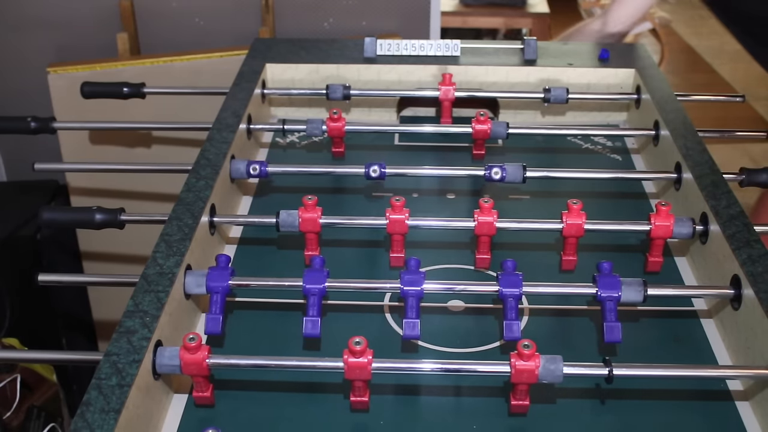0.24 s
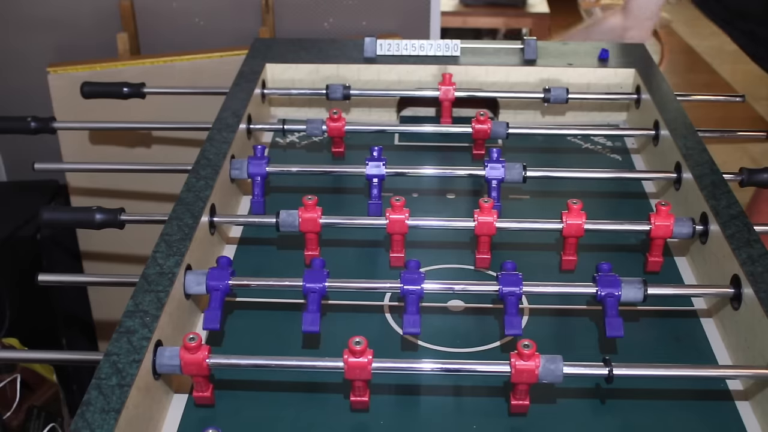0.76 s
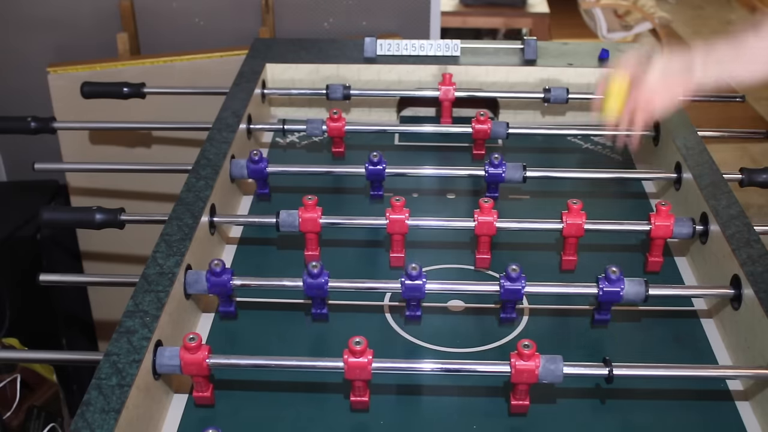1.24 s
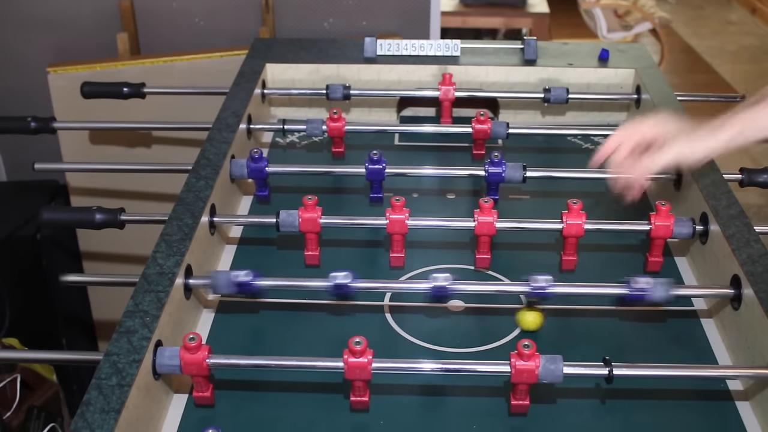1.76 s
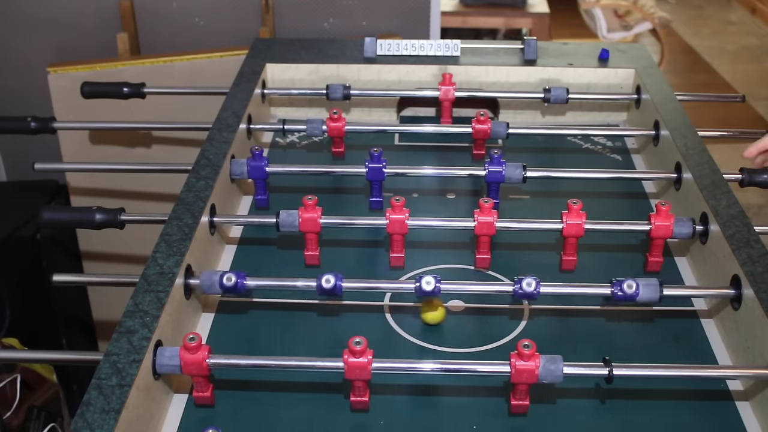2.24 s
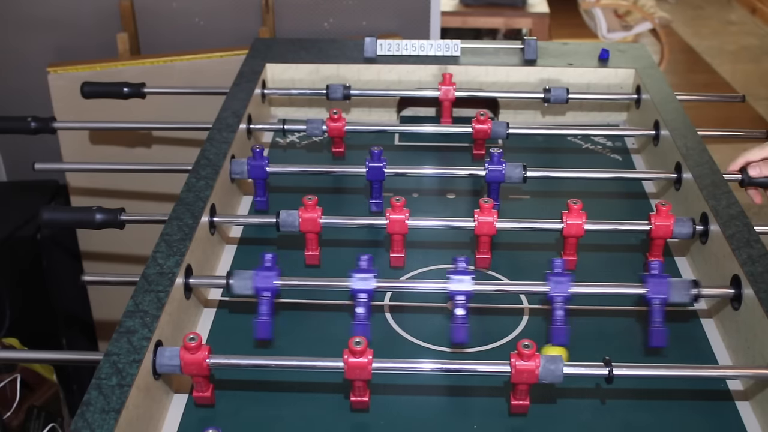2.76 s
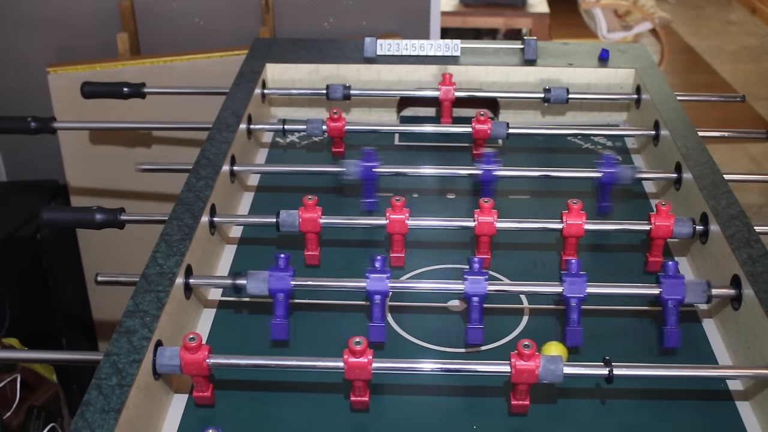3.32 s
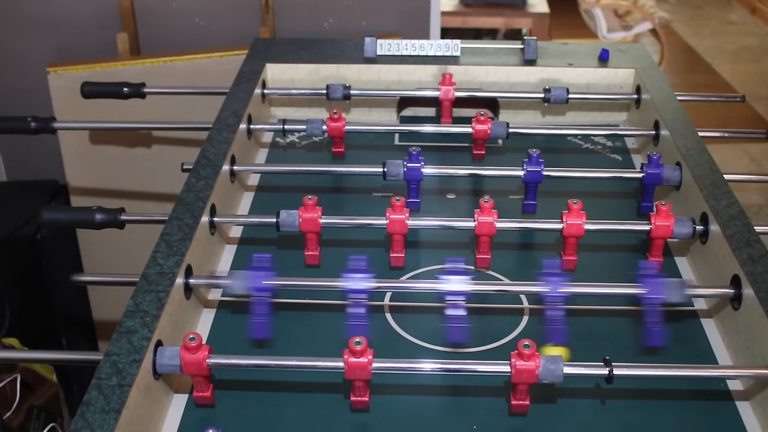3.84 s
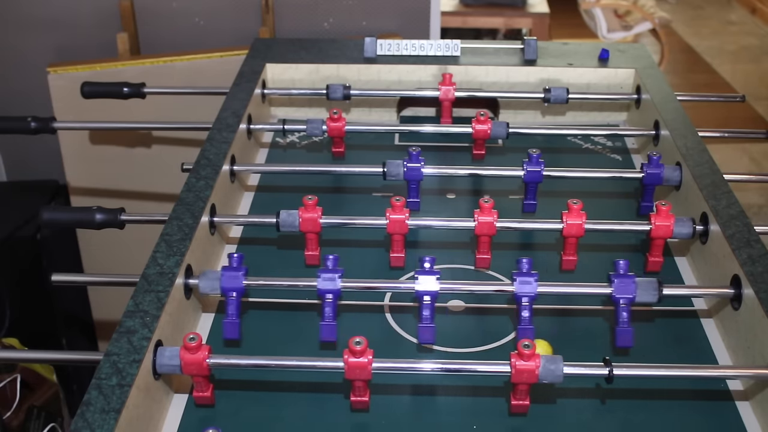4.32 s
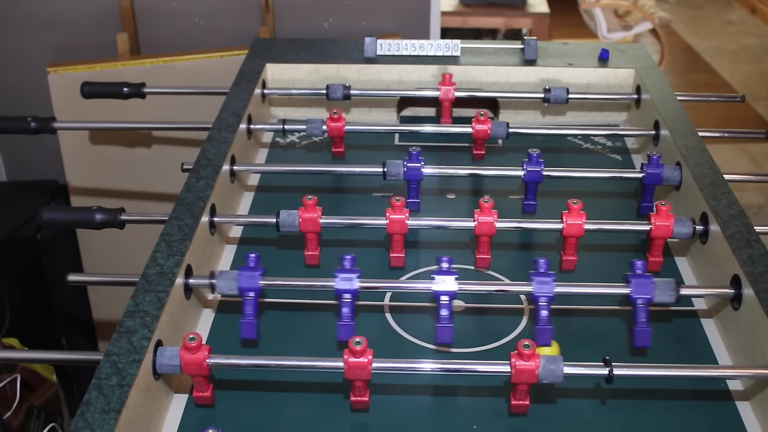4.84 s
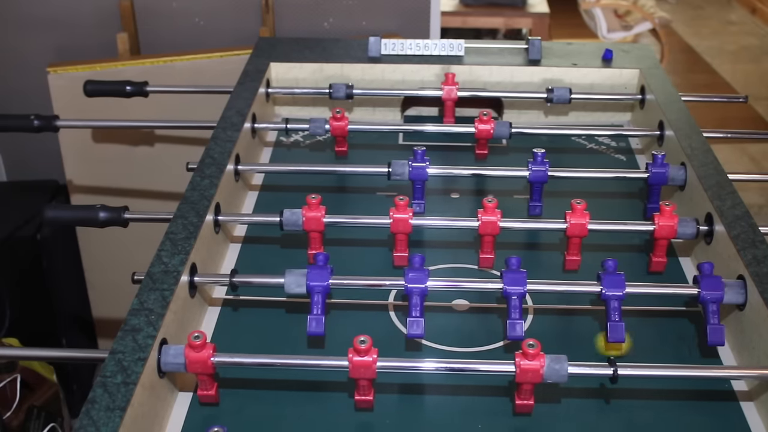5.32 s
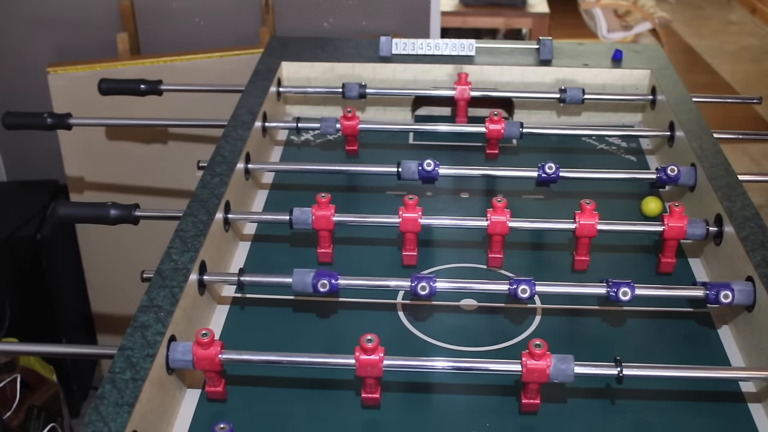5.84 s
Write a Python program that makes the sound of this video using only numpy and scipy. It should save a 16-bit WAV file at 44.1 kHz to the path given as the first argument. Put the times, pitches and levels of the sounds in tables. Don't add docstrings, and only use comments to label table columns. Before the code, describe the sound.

Table football heard very near in a small indoor room. Quiet hollow knocks come first, then a loud booming drop of the ball, grainy rolling, and hard plastic kicks that shake the wooden table. A spell of repeated rod scraping and metallic clacks follows, before a final burst of booming blows, busy plastic rattling and a faint high steel ring. Light hiss lies underneath, with short room echoes.

```python
import sys
import numpy as np
from scipy import signal
from scipy.fft import rfft, irfft, next_fast_len
from scipy.io import wavfile
from scipy.ndimage import uniform_filter1d

SR = 44100
rng = np.random.default_rng(int(sys.argv[2]) if len(sys.argv) > 2 else 0)


def pcm_store(signal):
    levels = np.round(np.clip(np.atleast_2d(signal), -1, 1) * 32767)
    wavfile.write(sys.argv[1], SR, levels.astype(np.int16).T)


def volts_from_decibels(level):
    exponent = np.asarray(level, float) / 20
    return 10 ** exponent


N = 268128

# start in seconds, board level in dB, then frame, rail and walls in dB against it.
BLOWS = [(0.265, -34.5, -14, -7, -4), (1.055, -42, -12, -9, -14), (1.554, -26.5, -6.5, -23, -8),
         (1.612, -21, -17, -2.5, -3), (1.6492, -6, -13.5, -17, -6), (2.252, -3, -14.5, -13, -8.5),
         (2.412, -3.5, -12, -20, -10), (2.607, -14.5, -21, -6.5, -12.5), (2.702, -35, -24, 10, -27),
         (2.861, -6, -5, -11, -3.5), (3.54, -40, 10, -3, -31), (3.738, -10, -14, -28, -30),
         (5.2507, -3.5, -11, -17.5, -7.5), (5.413, -17, -0.5, -6, -12), (5.614, -9.5, -44, -1, -5.5),
         (5.715, -21, -36, 2, 0)]
# frequency in Hz, level in dB, t60 in seconds.
FRAME_MODES = [(70.4, -5, 0.33), (85.1, -9.5, 0.38), (130.3, 0.5, 0.22), (147, -6, 0.25)]
BOARD_MODES = [(173, -12, 0.12), (192.3, -4.5, 0.14), (225.8, -2.5, 0.2), (248.5, 0, 0.21), (274, -9, 0.19),
               (299, -2, 0.13), (331.6, -1.5, 0.072), (351.6, -0.5, 0.14), (388, 0, 0.044)]
RAIL_MODES = [(423, -11, 0.091), (469, -6.5, 0.053), (523, -6.5, 0.048), (562.7, -9.5, 0.068),
              (645, -13, 0.041), (705, -10.5, 0.051), (791, -13, 0.074)]
WALL_MODES = [(920, -40, 0.015), (932.2, -2, 0.11), (972, 12.5, 0.015), (1167, -0.5, 0.02),
              (1196, 4.5, 0.029), (1272, -1, 0.085), (1385, 4.5, 0.028), (1504, -5, 0.043),
              (1520, -12, 0.024)]
# start in seconds, length in seconds, board level in dB, nearness to the walls in dB, frame in dB.
ROLLS = [(-.05, 0.072, -39.5, 3.5, -4.5), (0.135, 0.13, -49, 6, -8), (0.663, 0.11, -46, 12, -19),
         (1.35, 0.36, -45.5, 1, -35), (1.672, 0.19, -30.5, -4, -1), (1.814, 0.4, -30, -2, -12),
         (2.348, 0.067, -24, -1, -4), (2.44, 0.18, -29, -0.5, -2.5), (2.643, 0.16, -29.5, -1, -10),
         (2.89, 0.11, -27.5, -1, 1), (3.048, 0.28, -38.5, 6.5, -8), (3.242, .14, -30, 7, -5),
         (3.401, 0.3, -37, 10.5, 2), (3.649, 0.35, -35.5, 8.5, -11), (3.997, 0.26, -37.5, 8.5, 0),
         (4.278, 0.23, -35.5, 6.5, -4), (4.455, 0.31, -37.5, 8, 0.5), (4.778, 0.34, -46, 10, -7.5),
         (5.096, 0.23, -36, 5, -16), (5.301, 0.15, -29, 6.5, -19), (5.408, 0.15, -24, 4.5, -8),
         (5.62, 0.056, -28.5, 1, -33), (5.718, 0.16, -28, 10.5, -22), (5.828, .24, -44, 9, 2.5)]
# start and length in seconds, Hz, level in dB.
HUMS = [(1.335, 0.13, 217.4, -47), (1.43, 0.11, 335, -45), (1.616, 0.031, 390, -26.5),
        (1.62, .06, 950, -30), (1.68, .08, 1250, -43), (1.691, 0.086, 297, -25), (1.659, 0.05, 2150, -48.5),
        (2.269, 0.15, 251, -21), (2.372, .04, 950, -38), (2.438, .14, 242.6, -23),
        (2.599, 0.085, 960, -33.5), (2.72, .13, 942, -34), (2.6, 0.28, 550, -36), (2.691, 0.17, 343, -24.5),
        (2.871, 0.041, 1367, -27), (2.93, 0.15, 250.5, -24), (2.951, .07, 1330, -38),
        (3.643, 0.051, 380, -34.5), (3.746, 0.063, 342, -25), (5.419, 0.17, 960, -37),
        (5.63, .022, 371, -15), (5.628, 0.046, 1000, -35), (5.72, 0.054, 393, -27.5), (5.74, .07, 794, -34),
        (5.742, 0.056, 1410, -29.5), (5.819, 0.077, 416, -30), (5.829, 0.063, 1450, -36),
        (3.34, .025, 2700, -40), (3.35, .03, 2300, -35), (3.905, .03, 2350, -39), (5.64, .1, 270, -28),
        (2.66, .15, 1300, -45), (2.68, .15, 270, -28), (5.16, .08, 170, -40), (1.95, .15, 68, -41),
        (4.15, .15, 125, -36), (4.45, .12, 190, -42), (3.3, .12, 200, -34), (.42, .1, 130, -50),
        (5.255, .03, 1300, -31), (5.42, .03, 2400, -39), (1.69, .08, 2300, -58), (2.43, .2, 70, -32),
        (5.42, .16, 68, -33), (1.15, .15, 250, -58), (5.42, .07, 6500, -42), (5.2, .12, 150, -37),
        (3.01, .09, 250, -25)]
# start in seconds, Hz, level in dB, t60 in seconds.
BOUNCES = [(1.732, 307, -16, .08), (1.858, 300, -26, .06), (2.019, 280, -19, .06), (2.042, 302, -22, .06),
           (2.072, 298, -23, .06), (2.152, 280, -20, .06), (2.554, 247, -20, 0.053), (2.794, 338, -12, .06),
           (2.937, 253, -19, 0.066), (5.575, 330, -19, .06), (5.6145, 580, 2, .03), (5.616, 2100, -11, .03),
           (5.716, 1300, -7, .025), (5.721, 2700, -13, .03), (1.648, 1250, -10, .03),
           (3.746, 980, -25, .07), (1.655, 2050, -23, .05), (2.863, 1400, -13, .04), (2.5, 260, -15, .04),
           (2.32, 260, -15, .04), (2.356, 260, -16, .04), (5.3, 250, -14, .05), (5.895, 330, -20, 0.032)]
# start in seconds, Hz, level in
# dB, t60 in seconds.
MORE_TONES = [(.163, 355, -29, .15), (.172, 641, -28, .08), (.168, 800, -32, .12), (.345, 339, -32, .13),
              (.352, 635, -32, .08), (.35, 800, -35, .13), (.662, 360, -18, .1), (.662, 620, -18, .05),
              (.69, 786, -30, .2), (1.6607, 310, -14, .05), (1.668, 300, -13, .05), (2.268, 260, -12, .05),
              (2.29, 250, -18, .1), (2.43, 260, -12, .04), (3.757, 330, -16, .06), (5.253, 145, -13, .2),
              (5.63, 275, -15, .12)]

# start in seconds, peak level in dB, crack in dB and cavity ring in dB against it.
KNOCKS = [
    (0.163, -29, -34, 7),
    (0.343, -32, -29, 7.5),
    (0.651, -10, -1, -8.5),
    (0.661, -8.5, -11, -11.5),
]
# frequency in Hz, level in dB, t60 in seconds.
TRAY_MODES = [(195, -17, 0.35), (280, -14, 0.25), (350, 5.5, 0.092), (403, -6.5, 0.22), (659, 3.5, 0.081),
              (733, 8, 0.034), (784.7, 1.5, 0.15), (812, -5.5, 0.12), (840, -22, 0.084), (1050, -25, 0.061),
              (1204, -9, 0.066), (1420, -18, 0.12), (1500, -12, 0.11), (2010, -12, 0.067), (2470, -18, .06)]
# frequency in Hz, width in Hz, level in dB.
TRAY_RAP = [(290, 58, -5), (627, 164, -2.5), (1100, 910, -8.5), (1860, 900, -11.5), (4700, 850, -28)]
# frequency in Hz, level in dB, t60 in seconds.
CAVITY_MODES = [(472, 0, 0.44)]

# start in seconds, Hz, level in dB, chatter time in seconds.
CLATTER = [(.164, 1550, -50, .012), (.35, 1480, -46, .025), (.655, 4600, -44, .015),
           (1.6495, 1300, -24, .004), (1.651, 2200, -33, .006), (1.66, 1350, -28, .006),
           (1.833, 2300, -44, .01), (2.2525, 2100, -26, .003), (2.267, 1050, -22, .007),
           (2.327, 2300, -32, .003), (2.4125, 2200, -28, .003), (2.426, 2300, -29, .004),
           (2.426, 1200, -27, .005), (2.434, 2300, -28, .003), (2.563, 2300, -33, .008),
           (3.352, 2500, -31, .006), (3.357, 1200, -36, .008), (3.737, 1000, -29, .008),
           (3.762, 2900, -40, .003), (5.424, 1300, -27, .005), (5.432, 2500, -28, .006),
           (5.453, 3400, -29, .006), (5.472, 1200, -28, .005), (5.49, 2300, -35, .006),
           (5.522, 1300, -28, .004), (5.53, 3000, -32, .008), (5.552, 2500, -33, .008),
           (5.617, 2200, -22, .003), (5.63, 2300, -32, .005), (5.7215, 2700, -23, .003),
           (2.8625, 2400, -24, .004), (5.354, 8800, -24, .002), (.263, 2000, -44, .012),
           (5.745, 2200, -27, .004), (5.763, 1500, -27, .004), (5.79, 2600, -29, .004),
           (5.81, 2200, -29, .003), (5.85, 1500, -28, .005), (2.864, 1400, -20, .004),
           (.177, 560, -34, .012), (.355, 560, -38, .012)]

# start in seconds, steel in dB, plastic in dB against it, chatter in seconds.
STOPS = [(1.0957, -38.5, -12.5, 0.017), (1.6594, -24.5, -7.5, 0.0038), (1.934, -17, -10, .016),
         (3.2783, -14, -11.5, 0.019), (3.5679, -17, -9.5, 0.023), (3.8615, -12.5, -11.5, 0.017),
         (4.051, -36.5, -7.5, 0.01), (4.156, -14.5, -10, 0.011), (4.4411, -18, -8, 0.019),
         (4.7415, -14.5, -10.5, 0.011), (5.3526, -5, -15.5, 0.0052)]
# start in seconds, steel in dB, plastic in dB, chatter time in seconds.
KICKS = [
    (2.252, -23.5, -2, 0.006),
    (2.327, -34, 2, 0.0061),
    (2.4128, -26, 0.5, 0.015),
    (2.569, -29, 0.5, 0.026),
    (2.8624, -29, 10.5, 0.0091),
    (2.9612, -40.5, 7, 0.02),
]
# start in seconds, steel in dB, plastic in dB, chatter in seconds.
TAPS = [(.263, -49.5, 9.5, .012), (.5378, -47.5, -4, .07), (.6552, -37.5, 5.5, 0.021),
        (1.17, -56, 6.5, 0.007), (1.5531, -38, -2.5, 0.024), (1.6494, -50, -9, 0.009),
        (2.389, -32, -9, 0.0054), (3.4456, -36, -0.5, 0.015), (3.7624, -23, -10.5, 0.012),
        (5.2137, -22.5, -13.5, 0.0093), (5.2215, -17.5, -12, 0.0032), (5.2524, -44, 15, 0.0046),
        (5.38, -23, -24, 0.091), (5.5179, -33.5, 10.5, 0.026), (5.6154, -16.5, 5, 0.002),
        (5.7158, -30, 16.5, 0.0072), (5.896, -25.5, -4, 0.011), (5.945, -29.5, -8, .0069)]
# start in seconds, steel in dB, plastic in dB, chatter time in seconds.
TICKS = [
    (1.075, -47.5, -10, 0.022),
    (1.8307, -31, -19, 0.0073),
    (1.8399, -27, -7.5, 0.0094),
    (2.7472, -41, -5, 0.0098),
    (3.0608, -39.5, -5, 0.016),
    (4.3453, -39, -13, 0.03),
    (5.066, -57, 7, 0.01),
    (5.1682, -44, 6, .01),
]
# start in seconds, length in seconds, figures in dB, bare steel in dB against the figures.
STROKES = [(0.514, 0.078, -50, -5), (1.03, 0.24, -64, -8), (1.22, 0.21, -58, -9),
           (1.383, 0.16, -52.5, -2.5), (1.553, 0.085, -44, -22), (1.789, 0.12, -38.5, -10),
           (1.928, 0.11, -42, -4.5), (2.298, 0.1, -36, -12.5), (2.44, 0.11, -36.5, -11.5),
           (2.553, 0.085, -37, -26), (2.858, 0.26, -42, -15), (3.138, 0.15, -44.5, -2),
           (3.3, 0.084, -30.5, -16), (3.42, 0.13, -44.5, -2.5), (3.56, 0.3, -44.5, -3.5),
           (3.878, 0.11, -38.5, -7), (3.99, 0.14, -47, -1.5), (4.15, 0.12, -41, -10), (4.26, 0.22, -45, -3),
           (4.45, 0.12, -43, -8.5), (4.581, 0.095, -43, -4.5), (4.797, 0.33, -51.5, -14),
           (5.113, 0.072, -54, 3.5), (5.286, 0.073, -40, -5.5), (5.374, 0.1, -24.5, -11.5),
           (5.53, 0.079, -40.5, -23), (5.62, 0.044, -50, 4.5), (5.721, 0.13, -28, -17),
           (5.858, 0.056, -34, -9), (5.937, 0.093, -41, -31)]
# frequency in Hz, width in Hz, level in dB.
PLASTIC = [(1170, 200, -2.5), (2035, 850, -3.5), (2328, 226, 3), (2792, 254, -3), (3680, 1430, -8.5)]
BUSH = [(3900, 810, -6.5), (4870, 370, 1), (5570, 580, -2)]
STEEL = [(6980, 1010, 0.5), (8860, 870, -2.5), (9730, 400, -1.5)]
SPARKLE = [(10840, 1250, 13), (12900, 2400, 10.5), (14360, 1700, 10.5)]
# start in seconds, Hz, level in dB, t60 in seconds.
RINGS = [
    (5.452, 13410, -42, .6),
    (5.452, 13270, -48, .6),
    (5.888, 13410, -48, .2),
    (5.888, 13270, -46, .4),
]
# start in seconds, Hz, level in dB, t60 in seconds.
SQUEAKS = [(.538, 1297, -47, .12), (.54, 1545, -47, .13), (.52, 2536, -55, .12), (.538, 3085, -53, .08),
           (.54, 4054, -55, .12), (.545, 4404, -58, .08), (.535, 5125, -59, .08), (.555, 5750, -59, .08),
           (.565, 958, -45, .1), (.578, 958, -41, .1), (.578, 3085, -49, .12), (.585, 1949, -55, .08),
           (.595, 1577, -54, .1), (.585, 4511, -54, .1), (.595, 4791, -56, .08), (.585, 5281, -58, .08),
           (.545, 6595, -61, .08), (.59, 5750, -60, .08), (.59, 7585, -64, .08)]

# frequency in Hz, t60 in seconds, level in dB.
ROOM = [(145, 0.58, -2.5), (380, 0.38, 0), (1060, 0.31, -2.5), (2600, 0.32, 2), (6240, 0.27, 0.5),
        (12000, 0.33, -0.5)]
# frequency in Hz, left-right likeness from 0 to 1.
LIKENESS = [(100, 0.97), (400, 0.98), (800, 0.84), (1600, 0.6), (3000, 0.42), (6000, 0.023), (14000, 0.045)]
# frequency in Hz, level in dB.
PORTS = [(60, -18), (110, -5), (200, -22), (380, -14.5), (700, -15.5), (1290, -3), (2380, -0.5), (4400, 5),
         (8120, 5.5), (15000, 4)]
# frequency in Hz, level in dB per Hz.
AIR = [(15, -33), (25, 23), (130, -12), (293, -5), (416, -6), (489, -8), (624, -12), (936, -9.5),
       (1790, -14.5), (2910, -14.5), (9570, -23), (16000, -29)]
AIR_DB = -42
REST_DB, STILL_DB = -62, -77


def table():
    out = np.zeros(N)
    parts = (BOARD_MODES, FRAME_MODES, RAIL_MODES, WALL_MODES)
    for s, db, frame_db, rail_db, walls_db in BLOWS:
        force = blow(0.0079, 2.05, first=2.65)
        for part_db, modes in zip((0, frame_db, rail_db, walls_db), parts):
            boom = radiate(ring(force, modes, 2.13), modes)
            add(out, s, crest(boom, db + part_db - 3.0))

    lumps = 1.44 * walk(11)
    s, length, db, near_db, frame_db = np.transpose(ROLLS)
    rail_db = db - 12 + 0.54 * near_db
    walls_db = db - 14.5 + near_db
    parts_db = (db, db + frame_db, rail_db, walls_db)
    for part_db, rest_db, modes in zip(parts_db, (4.5, -8, -5.0, -5), parts):
        bumps = signal.lfilter([1], [1, -0.75], grit(N, 2.83)) * volts_from_decibels(1.0 * walk(25) + lumps)
        rumble = sum(ring(bumps * volts_from_decibels(2 * walk(12)), [mode]) for mode in modes)
        gain = swells(s, length, part_db, rise=0.19, release_s=0.087, rest_db=REST_DB + rest_db)
        out += gain * unit(radiate(rumble, modes))
    return out


def hums():
    out, release_s = np.zeros(N), 0.022
    for s, length, hz, db in HUMS:
        t = np.arange(next_fast_len(int((length + release_s) * SR))) / SR
        shape = np.clip(np.minimum(t / 0.0098, 1 + (length - t) / release_s), 0, 1) ** 2
        peak = [(hz, hz / 8, 0)]
        tone = body(body(grit(SR // 2, 2.5)[:len(t)], peak), peak)
        tone = tone / np.abs(signal.hilbert(tone) + 1e-9) ** 0.45
        add(out, s, volts_from_decibels(db) * shape * tone / np.sqrt(np.mean(tone[shape > 0] ** 2)))
    return out


def tray():
    wood, cavity = np.zeros((2, N))
    push = np.sin(np.pi * np.clip(np.arange(SR // 2) / SR / 0.00039, 0, 1))
    low_modes = [mode for mode in TRAY_MODES if mode[0] < 1e3]
    high_modes = [mode for mode in TRAY_MODES if mode[0] >= 1e3]
    for s, db, crack_db, cavity_db in KNOCKS:
        add(wood, s, crest(ring(push, low_modes, 0.85), db - 5))
        add(wood, s, crest(ring(push, high_modes, 2.4), db + crack_db - 14.0))
        add(wood, s, crest(body(blow(0.023, 5.15, first=0.45), TRAY_RAP), db - 16.0))
        add(cavity, s, crest(ring(push, CAVITY_MODES), db + cavity_db - 6))
    above_bass = signal.butter(4, 160, "high", fs=SR, output="sos")
    return signal.sosfilt(above_bass, [wood, cavity])


def clatter():
    out = np.zeros(N)
    for s, hz, db, chatter_s in CLATTER:
        peak = [(hz, hz / 3.5, 0)]
        rattle = blow(chatter_s, 2.2, length_s=.1, first=1.5)
        add(out, s, crest(body(body(rattle, peak), peak), db))
    return out


def rod_chatter():
    out = np.zeros(N)
    for rows, sparkle_db in ((STOPS, -11.5), (KICKS, -6), (TAPS, -23), (TICKS, -2.5)):
        for s, db, plastic_db, chatter_s in rows:
            steel = blow(chatter_s, 2.18, length_s=0.45, first=-0.47)
            plastic = blow(chatter_s, 2.18, length_s=0.45, first=-0.47)
            add(out, s, crest(body(steel, BUSH + STEEL), db - 10))
            add(out, s, crest(body(plastic, PLASTIC), db + plastic_db - 0.5))
            add(out, s, crest(body(steel, SPARKLE), db + sparkle_db - 6.5))
    return out


def rod_slides():
    out = np.zeros(N)
    judder = volts_from_decibels(4.0 * walk(40))
    s, length, db, bare_db = np.transpose(STROKES)
    bush_db = db - 0.5 + 0.91 * bare_db
    sparkle_db = db + 1 + 1.8 * bare_db
    parts_db = (db, bush_db, db + bare_db, sparkle_db)
    for part_db, still_db, peaks in zip(parts_db, (0, -3, -13.0, -14), (PLASTIC, BUSH, STEEL, SPARKLE)):
        gain = swells(s, length, part_db, rise=0.47, release_s=0.086, rest_db=STILL_DB + still_db)
        out += gain * unit(body(grit(N, 2.66) * judder, peaks)) * volts_from_decibels(-7.0)
    return out


def single_tones():
    out = np.zeros(N)
    t = np.arange(SR // 2) / SR
    for rows in (SQUEAKS, RINGS, BOUNCES, MORE_TONES):
        for s, hz, db, t60 in rows:
            envelope = (1 - np.exp(-t / 0.0022)) * 1000 ** (-t / t60)
            add(out, s, volts_from_decibels(db) * np.sin(2 * np.pi * hz * t) * envelope)
    return out


def ports(dry):
    hz = np.fft.rfftfreq(N, 1 / SR)
    lead = np.pi / 2 * np.clip(hz / 400, 0, .95)
    side = irfft(rfft(dry) * volts_from_decibels(on_log(PORTS, hz) - 6.0) * np.exp(1j * lead), N)
    return dry + side * np.array([[1], [-1]])


def room(first_s=0.0024):
    hz, noise = pair(SR)
    t = np.arange(SR) / SR
    centres, tail = np.array(ROOM)[:, 0], 0
    for k, (_, t60, db) in enumerate(ROOM):
        share = np.interp(np.log(hz + 1), np.log(centres), np.arange(len(ROOM)) == k)
        energy = np.sqrt(2 * np.log(1000) / (t60 * SR))
        tail = tail + volts_from_decibels(db) * energy * irfft(noise * share, SR) * 1000 ** (-t / t60)
    return tail * np.clip(t / first_s - 1, 0, 1)


def air():
    hz, noise = pair(N)
    return unit(irfft(noise * volts_from_decibels(on_log(AIR, hz)), N)) * volts_from_decibels(AIR_DB - 6 + 1.0 * walk(2.25))


def pair(count):
    hz = np.fft.rfftfreq(count, 1 / SR)
    like = np.clip(on_log(LIKENESS, hz), 0, 1)
    mid, side = rfft(rng.standard_normal((2, count)))
    both = np.sqrt(1 + like) * mid
    apart = np.sqrt(1 - like) * side * np.array([[1], [-1]])
    return hz, (both + apart) / np.sqrt(2)


def blow(chatter_s, spread_db, length_s=.5, first=3.0):
    t = np.arange(int(length_s * SR)) / SR
    chatter_s = max(chatter_s, 3e-4)
    force = grit(len(t), spread_db) * (np.exp(-t / chatter_s) + first * np.exp(-t / 0.0012))
    even = irfft(np.exp(1j * np.angle(rfft(force))), len(t))
    return even * np.exp(-t / (3 * chatter_s))


def grit(count, spread_db):
    return unit(rng.standard_normal(count) * volts_from_decibels(spread_db * rng.exponential(size=count)))


def ring(x, modes, uneven_db=0.):
    out = 0
    for (hz, db, t60), pick in zip(modes, rng.standard_normal((len(modes), 2))):
        pole = np.exp(2j * np.pi * hz / SR - np.log(1000) / (t60 * SR))
        gain = np.sign(pick[0]) * volts_from_decibels(db + uneven_db * pick[1])
        out = out + gain * signal.lfilter([0, pole.imag], [1, -2 * pole.real, abs(pole) ** 2], x)
    return out


def body(x, peaks):
    return sum((-1) ** k * volts_from_decibels(db) * signal.lfilter(*signal.iirpeak(hz, hz / width, SR), x)
               for k, (hz, width, db) in enumerate(peaks))


def radiate(x, modes):
    return signal.sosfilt(signal.butter(3, 0.74 * modes[0][0], "high", fs=SR, output="sos"), x)


def swells(starts, lengths, levels_db, rise, release_s, rest_db):
    t, power = np.arange(0, N + 64, 64) / SR, volts_from_decibels(rest_db) ** 2
    for s, length, db in zip(starts, lengths, levels_db):
        corners = s + np.cumsum([0, rise * length, (1 - rise) * length, release_s])
        shape = np.interp(t, corners, [0, 1, 1, 0])
        power = power + (volts_from_decibels(db) * shape ** 2) ** 2
    return np.interp(np.arange(N) / SR, t, np.sqrt(power))


def walk(rate):
    k = int(SR / rate)
    held = np.repeat(rng.standard_normal(N // k + 1), k)
    return unit(uniform_filter1d(held, k)[:N])


def crest(x, db):
    return x * volts_from_decibels(db) / np.sqrt(uniform_filter1d(x ** 2, size=176).max())


def unit(x):
    return x / np.sqrt(np.mean(x ** 2))


def on_log(spectrum, hz):
    return np.interp(np.log(hz + 1), np.log(np.array(spectrum)[:, 0]), np.array(spectrum)[:, 1])


def add(out, s, sound):
    i = int(s * SR)
    out[..., i:i + sound.shape[-1]] += sound[..., :N - i]


def scene():
    wood, cavity = tray()
    dry = table() + hums() + wood + clatter() + rod_chatter() + rod_slides() + single_tones()
    echoes = signal.fftconvolve(dry[None], room(), axes=1)[:, :N]
    return ports(dry) + echoes + cavity + air()


def roll_off(x):
    return signal.sosfilt(signal.butter(12, 15900, fs=SR, output="sos"), x)


def record(dry):
    low_cut = signal.butter(4, 51.4, "high", fs=SR, output="sos")
    heard = signal.sosfilt(low_cut, dry)
    return roll_off(np.clip(heard, -1, 1))


dry = scene()
out = record(dry)
pcm_store(out)
```